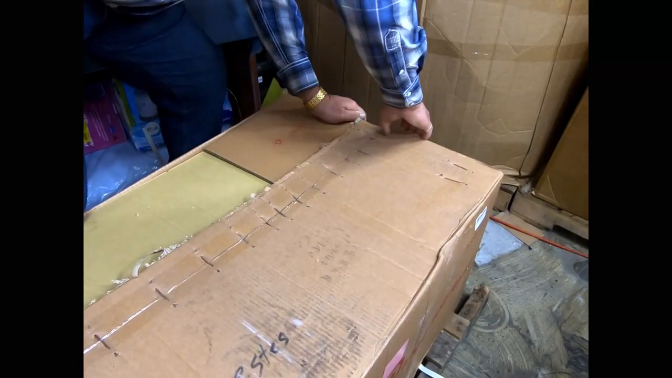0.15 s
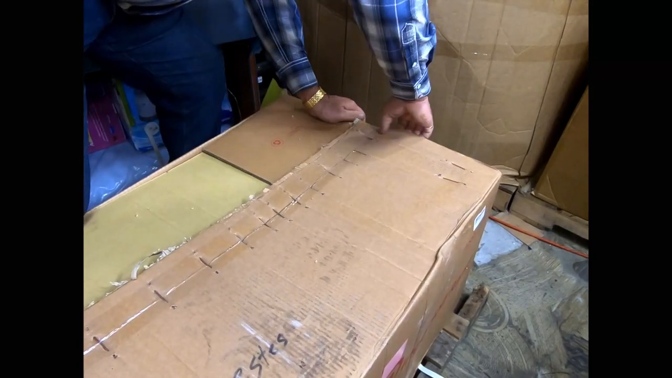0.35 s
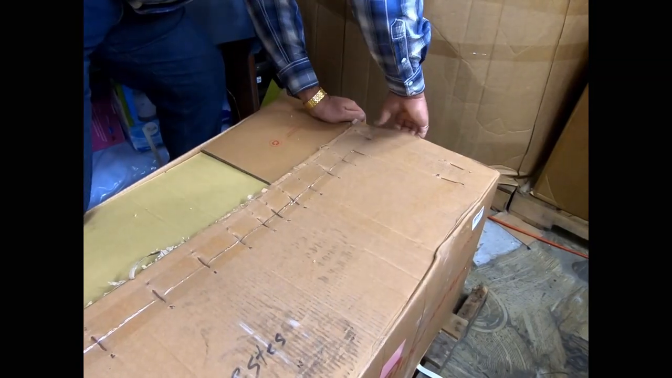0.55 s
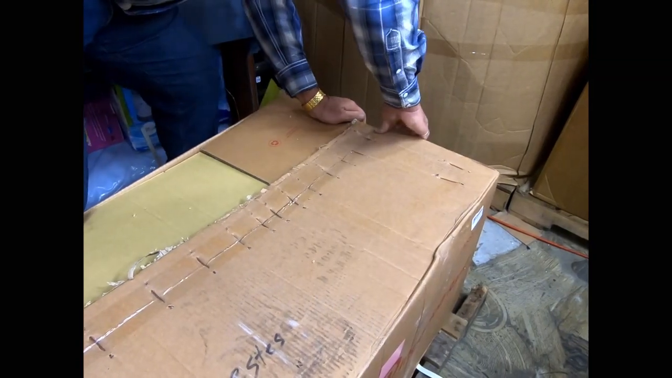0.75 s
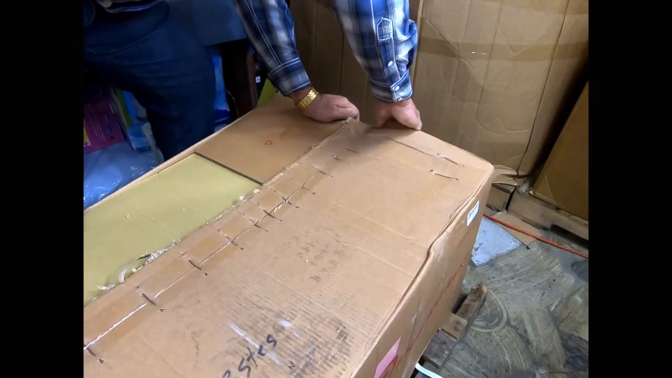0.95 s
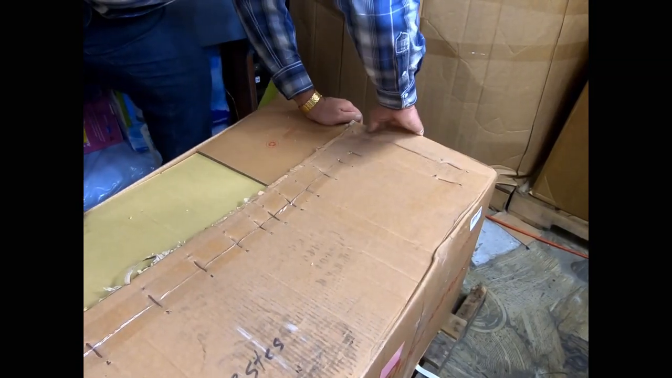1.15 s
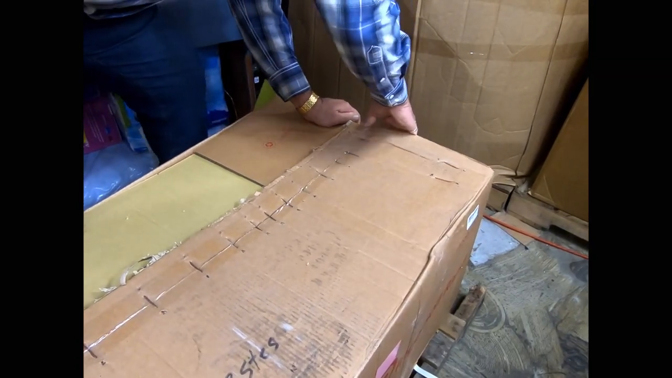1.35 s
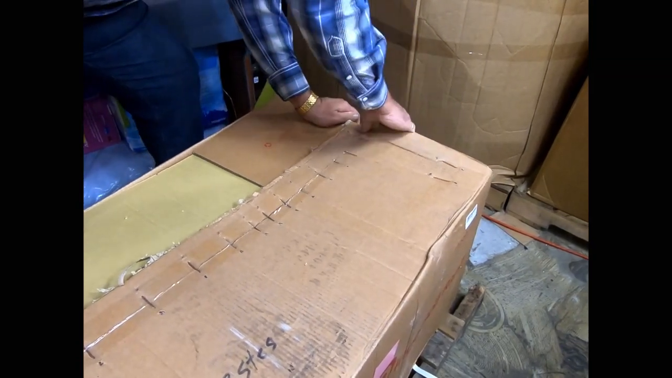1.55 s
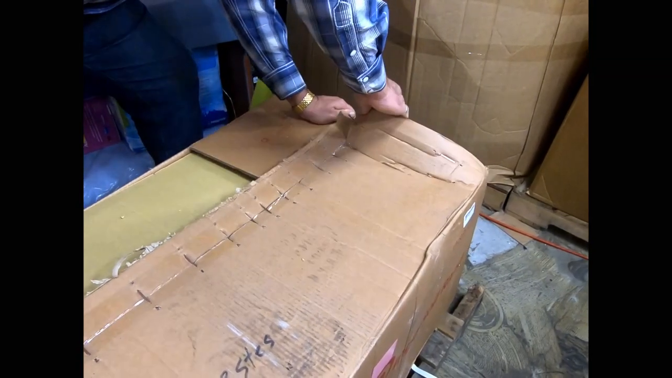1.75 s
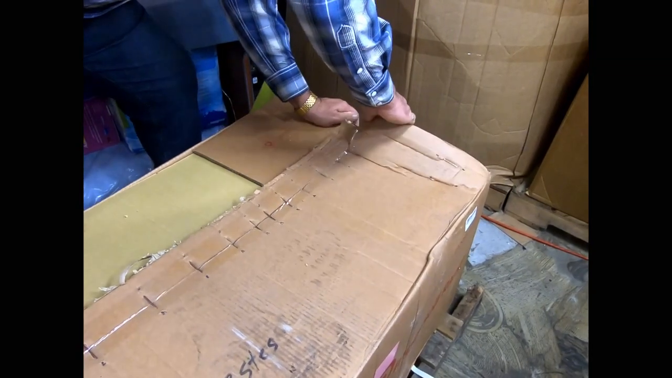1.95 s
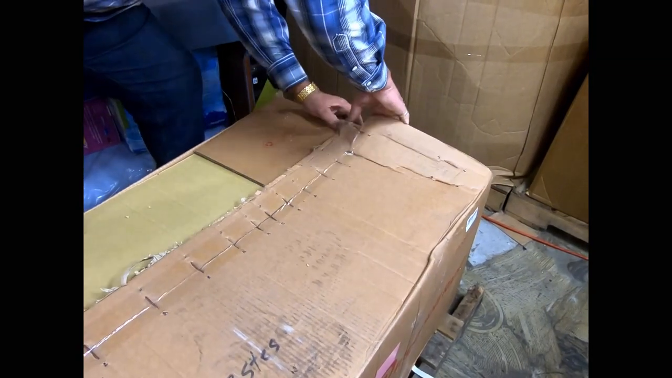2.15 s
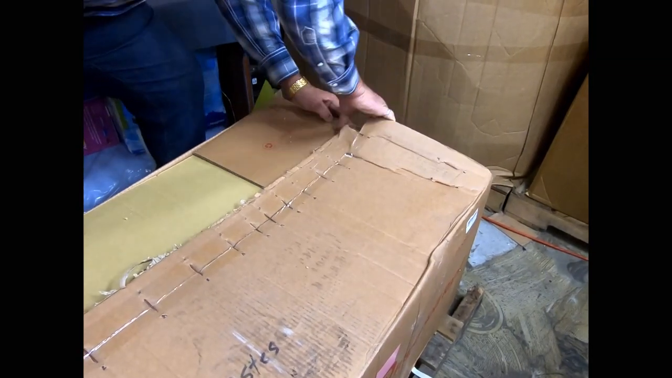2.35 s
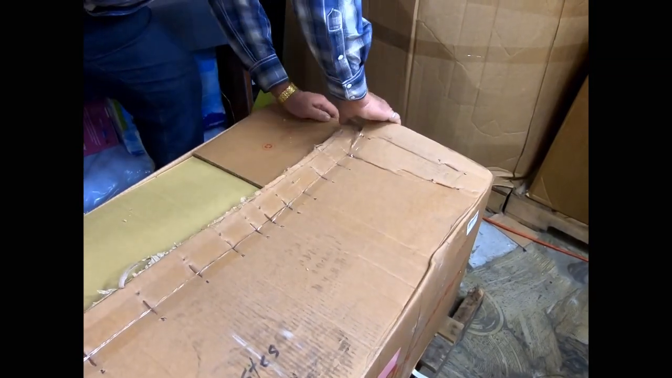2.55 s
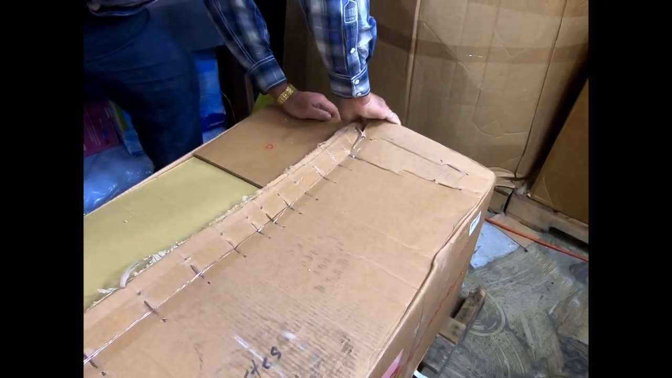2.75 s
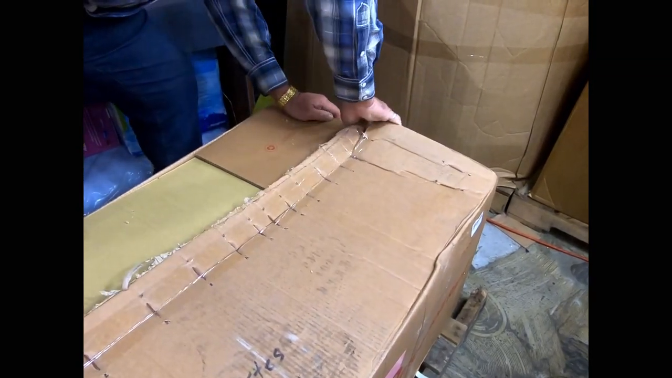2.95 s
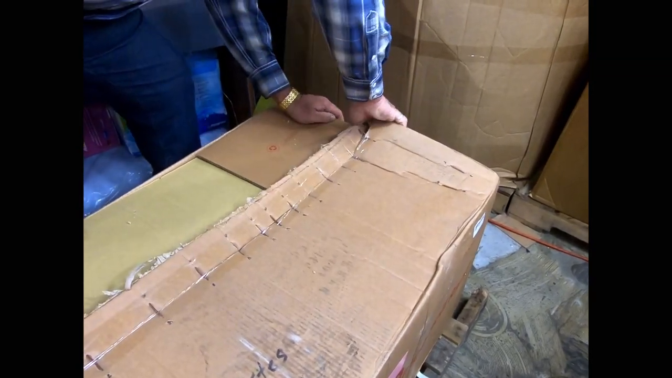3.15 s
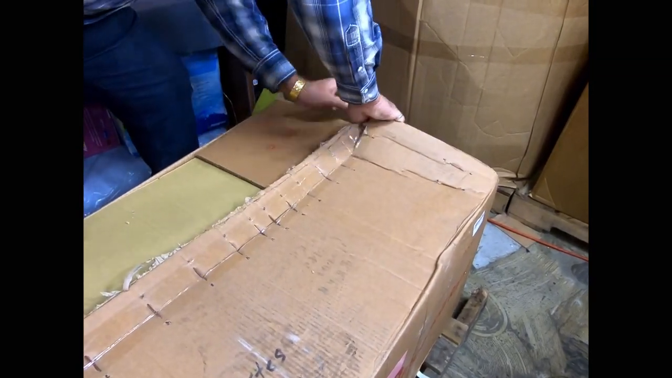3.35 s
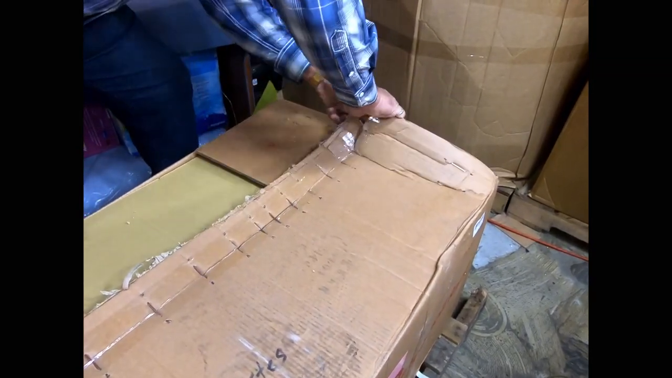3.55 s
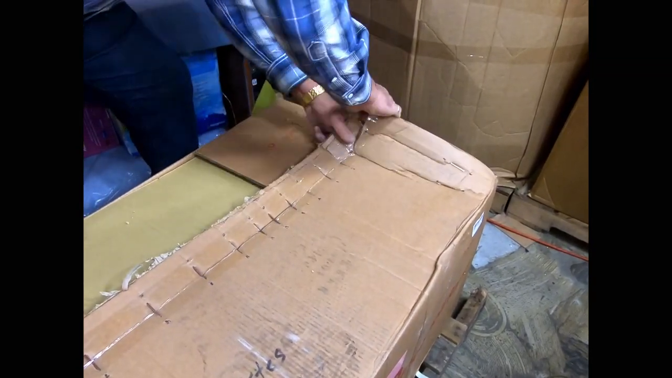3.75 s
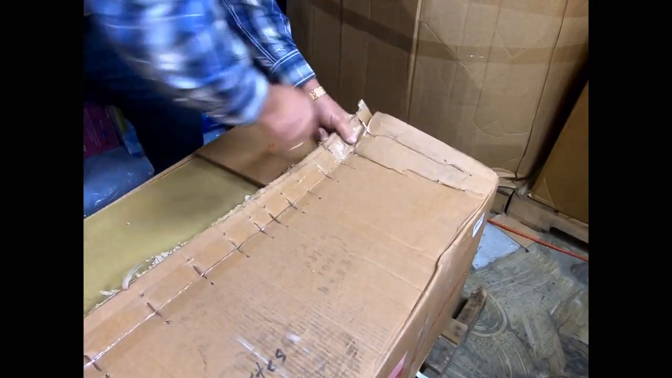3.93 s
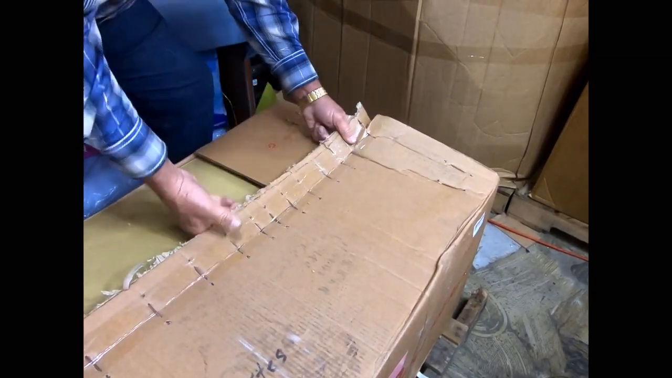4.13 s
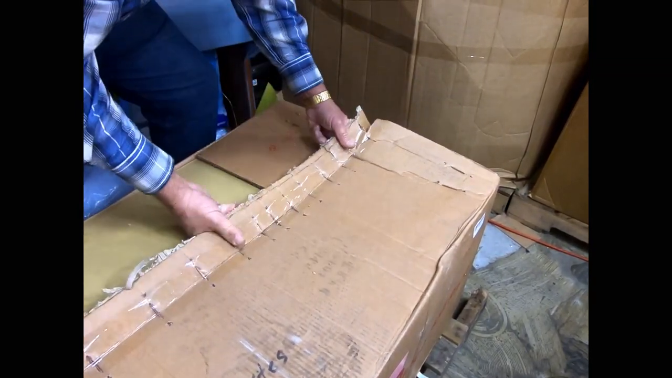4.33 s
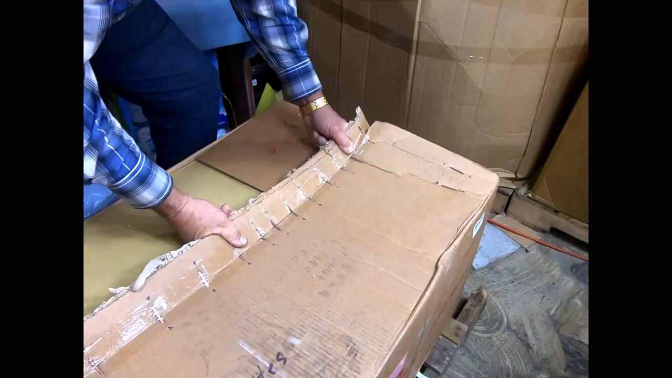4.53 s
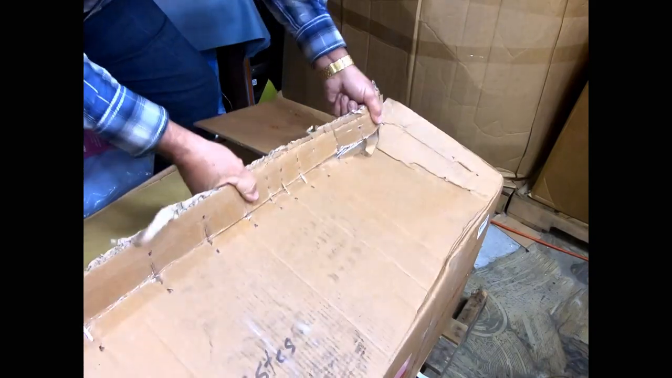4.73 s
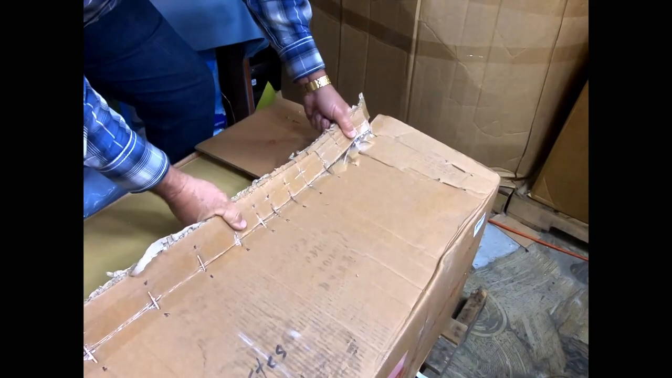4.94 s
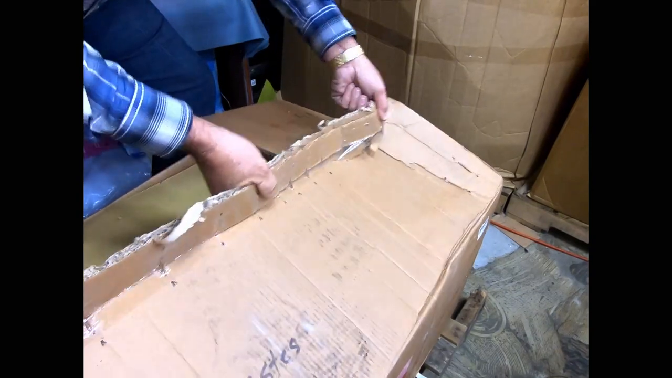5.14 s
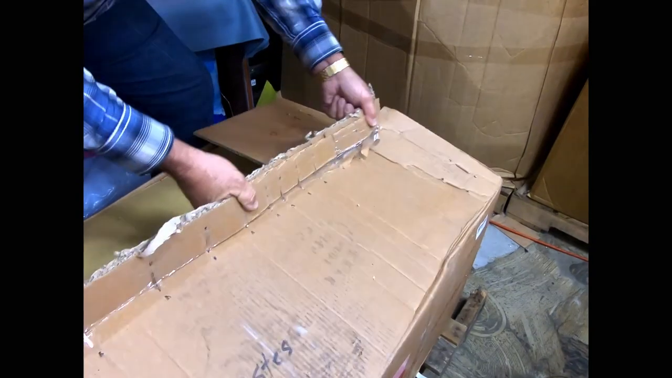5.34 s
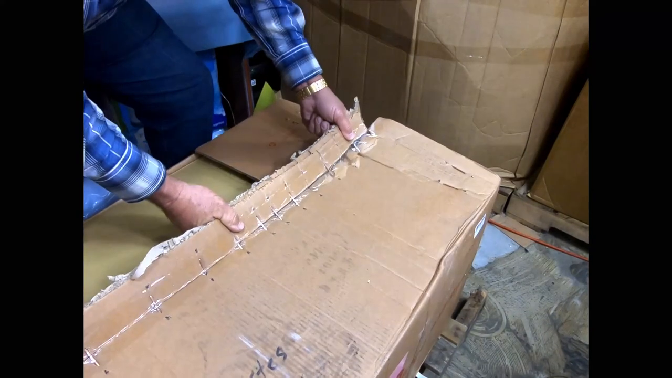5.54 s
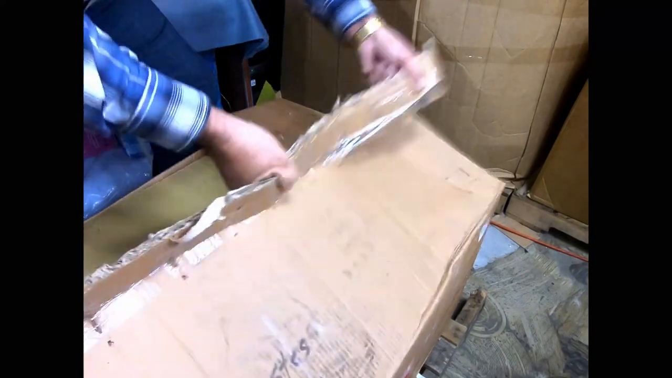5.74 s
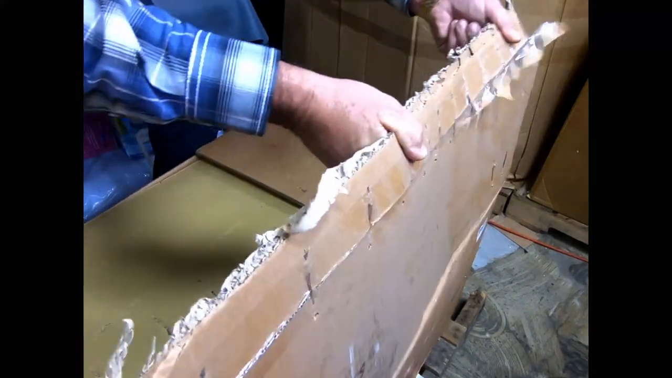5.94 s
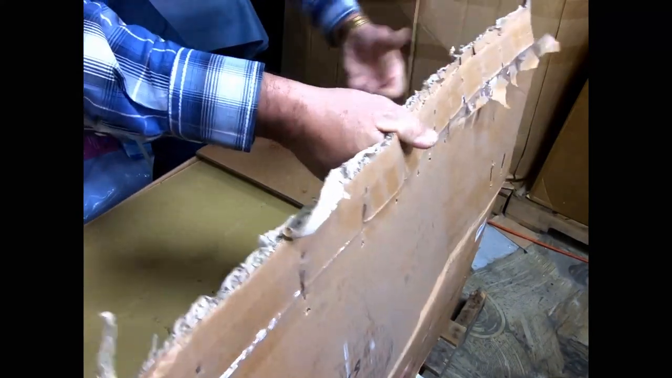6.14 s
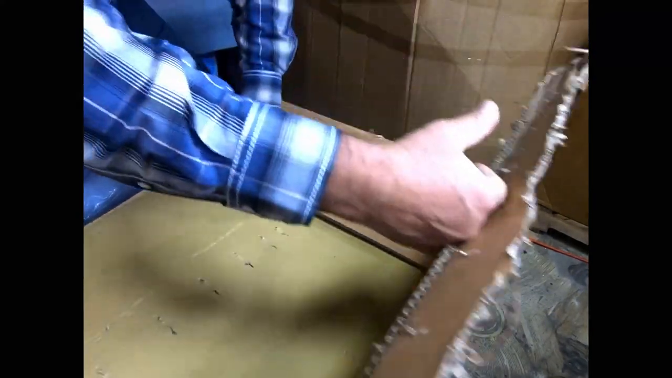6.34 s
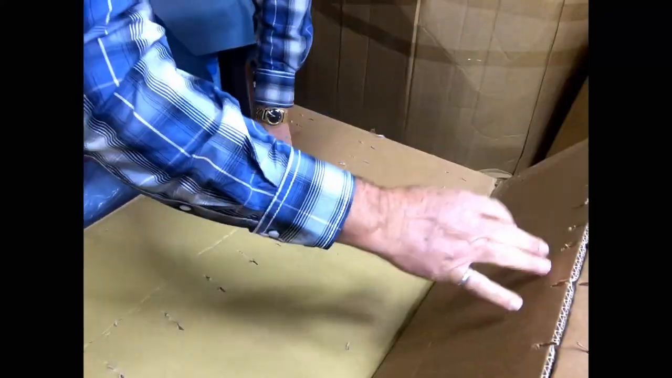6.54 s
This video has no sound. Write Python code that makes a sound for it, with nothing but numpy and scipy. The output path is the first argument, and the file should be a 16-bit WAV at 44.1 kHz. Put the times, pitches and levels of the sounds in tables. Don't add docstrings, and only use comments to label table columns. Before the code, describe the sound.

Close to a large hollow cardboard box in a bare, echoing storeroom with a faint hum. Hands rustle and press with small ticks, pops and short rubbing squeaks. A sudden hard tear cracks and booms, then quiet crackle. A staple snaps with papery fizz and creaking, staples drag in a rapid ratchet, and the flap rips away in loud bursts with deep thumps, wind buffets and final fine ticks.

```python
import sys
import numpy as np
from scipy import signal
from scipy.fft import rfft, irfft
from scipy.io import wavfile

SR = 44100
rng = np.random.default_rng(int(sys.argv[2]) if len(sys.argv) > 2 else 0)


def level_to_linear(level):
    exponent = np.asarray(level, float) / 20
    return 10 ** exponent


def persist_wave(psi):
    counts = np.round(np.clip(psi, -1, 1) * 32767).astype(np.int16)
    wavfile.write(sys.argv[1], SR, np.atleast_2d(counts).T)


N = 290486

# (frequency [Hz], level [dB per Hz])
HUM_SPECTRUM = [(20, -14), (50, 2.5), (120, 2), (300, -17.5), (700, -37), (1200, -22.5), (3000, -19.5),
                (7000, -39), (11000, -54.5), (16000, -60)]
# (time [s], rustle level [dB])
HANDLING = [(0, -60), (.3, -60), (.41, -67), (.68, -57), (.9, -66), (1.1, -65), (1.42, -58), (2.08, -62),
            (2.92, -66), (3.04, -66), (3.3, -59), (3.76, -70), (4.35, -54), (4.9, -52), (5.08, -66),
            (5.4, -53), (5.69, -72), (6.05, -57), (6.55, -59)]
# (peak time [s], time to swell 20 dB [s], crackle level [dB], time to fall 20 dB [s])
TEARS = [(.17, .16, -53, .25), (.93, .006, -41, .2), (.99, .06, -42, .08), (1.71, .16, -41, .06),
         (1.751, .004, -15, .095), (1.88, .11, -40, .33), (2.42, .6, -51, .3), (2.685, .06, -42, .05),
         (2.81, .008, -50, .04), (2.845, .03, -50, .05), (3.072, .01, -50, .1), (3.108, .05, -45, .07),
         (2.985, .07, -54, .07), (3.18, .01, -51, .04), (3.232, .012, -52, .2), (3.415, .12, -48, .08),
         (3.455, .015, -50, .05), (3.494, .003, -24, .03), (3.52, .02, -32, .19), (3.85, .015, -50, .1),
         (3.955, .16, -42, .025), (4.27, .08, -38.5, .11), (4.6, .15, -50, .2), (4.712, .01, -36, .11),
         (4.77, .075, -19, .055), (5.03, .2, -44.5, .03), (5.155, .012, -40, .05), (5.19, .02, -38, .05),
         (5.315, .1, -40, .02), (5.235, .07, -28.5, .07), (5.534, .012, -32, .04), (5.55, .02, -33, .03),
         (5.6, .3, -47, .03), (5.75, .015, -35, .3), (5.815, .025, -14, .06), (5.895, .05, -22.5, .05),
         (5.97, .11, -43, .4), (6.36, .16, -39, .05), (6.495, .04, -40, .04)]
# (peak time [s], time to swell 20 dB [s], rattle level [dB],
# time to fall 20 dB [s], boom above rattle [dB])
FLEXES = [(.41, .06, -53.5, .4, -3), (.6, .45, -52, .22, -1.5), (.94, .04, -49, .15, -9),
          (1.31, .2, -48, .55, -8), (1.727, .012, -21.5, .012, -12), (1.751, .004, -14.5, .045, -1.5),
          (1.81, .05, -28, .06, 8), (1.948, .008, -32, .025, -16), (2.7, .04, -53, .05, -1.5),
          (2.82, .02, -52, .09, 3), (3.11, .08, -54, .13, 3), (3.34, .06, -53, .06, -3),
          (3.494, .004, -31, .04, -5), (3.647, .006, -40, .04, -3), (2.29, .03, -55, .05, 2),
          (3.93, .06, -35, .04, -13), (4.37, .7, -53, .11, -8), (4.733, .02, -17, .05, -11),
          (4.77, .06, -25, .07, -11), (5.03, .2, -46, .03, -21), (5.238, .06, -32, .02, -26),
          (5.258, .006, -31, .05, -6), (5.3, .09, -39, .04, -1), (5.54, .17, -42.5, .11, -18),
          (5.845, .04, -9.5, .04, -2.5), (5.9, .05, -29, .11, 9), (6.54, .11, -52, .2, -1.5)]
# (peak time [s], time to swell 20 dB [s], level [dB],
# time to fall 20 dB [s])
RUBS = [(3.885, .05, -41, .03), (1.19, .11, -47, .15), (1.342, .015, -41, .05), (1.49, .012, -40, .012),
        (2.85, .06, -49, .03), (3.335, .05, -52, .04), (5.28, .11, -42, .06)]
# (frequency [Hz], level [dB per Hz])
FIBRE_SPECTRUM = [(1500, -39), (2500, 12), (3200, 6.5), (6000, 1), (8000, -1.5), (10000, -8),
                  (13000, -15.5), (16000, -21)]
# (frequency [Hz], width [Hz], level [dB])
PANEL_MODES = [(450, 80, -7.5), (611, 36, -1), (843, 220, -15)]
# (frequency [Hz], time to fall 60 dB [s])
ROOM_DECAY = [(200, 0.37), (1000, 0.3), (3000, 0.48), (8000, 0.53), (14000, 0.37)]
# (frequency [Hz], level [dB])
ROOM_COLOUR = [(200, -14), (700, -12.5), (1500, 1.5), (4000, -0.5), (9000, 4.5), (14000, -6.5)]
BAND_EDGES = 22 * 2 ** np.arange(0, 9.8, .5)
# (time [s], peak level [dB], ring [Hz], bright part level [dB])
SNAPS = [(0.038, -33, 3400, -35), (0.539, -32, 2200, -40), (0.927, -30, 2000, -25),
         (1.098, -37.5, 2020, -40), (1.694, -33, 1570, -37), (1.725, -19, 786, -30),
         (1.748, -0.5, 2970, -8), (1.779, -3.5, 1500, -25), (2.141, -37, 1530, -41),
         (2.203, -38, 1470, -53), (2.576, -30.5, 2950, -46), (2.651, -27, 2820, -31.5),
         (2.669, -35, 2500, -41), (3.491, -14, 1500, -5), (3.645, -19, 1400, -34), (3.684, -35, 1690, -46),
         (3.882, -30, 900, -42), (4.27, -23, 1760, -27), (4.289, -24, 1140, -33), (4.732, -5, 800, -13),
         (4.76, -12, 1890, -14), (4.881, -27.5, 3480, -41), (4.989, -32, 735, -39), (5.234, -16, 640, -27),
         (5.5, -33, 2500, -27), (5.529, -26, 1500, -30), (5.5865, -24.5, 2000, -36),
         (5.809, -16.5, 795, -11), (6.166, -35, 2160, -36), (6.475, -31, 1830, -39)]
# (time [s], peak level [dB], ring [Hz])
POPS = [(0.428, -37.5, 1190), (0.475, -28, 1500), (0.519, -30, 1250), (0.604, -37, 1500),
        (0.639, -39, 1400), (0.678, -39, 1360), (0.868, -35, 1250), (1.339, -33, 1210), (1.489, -36, 1300),
        (1.944, -25, 900), (2.807, -32, 1800), (2.838, -36, 1130), (3.105, -29, 3880), (3.174, -36, 1230),
        (3.918, -25, 891), (4.237, -28, 1150), (4.338, -23, 2770), (4.527, -36, 1630), (4.58, -24.5, 1590),
        (4.587, -25, 2500), (4.609, -28, 1670), (4.65, -24, 2040), (4.718, -12, 1000), (4.686, -30, 1200),
        (4.692, -32, 2200), (4.7205, -15, 900), (4.734, -10, 750), (5.183, -30, 1000), (5.193, -26, 750),
        (5.254, -15, 870), (5.2585, -16, 1100), (5.268, -27, 1700), (5.292, -27, 400), (5.535, -26, 1300),
        (5.734, -38, 810), (5.802, -18, 530), (5.8155, -14, 500), (3.878, -33, 950), (3.887, -31, 950),
        (3.936, -31, 900), (3.945, -34, 1000), (3.958, -34, 1500), (4.533, -36, 1600), (4.6, -31, 1600),
        (4.623, -33, 1600), (4.637, -34, 1900), (1.771, -9, 1500), (1.702, -34, 2000), (1.676, -38, 2500),
        (5.552, -29, 1000), (5.85, -8.5, 990), (6.425, -37, 2200)]
# (time [s], peak level [dB], centre [Hz])
TICKS = [(.112, -42, 2200), (.132, -43, 3500), (.176, -38, 6000), (.192, -43, 2200), (.2259, -41, 3500),
         (.24, -43, 2500), (.2513, -39, 3500), (.3258, -37.5, 6500), (.376, -42, 2600), (.394, -43, 3000),
         (.49, -42, 3500), (.66, -43, 2000), (.7153, -42, 2500), (.7322, -36, 6300), (.825, -43, 2200),
         (.834, -42, 2600), (.994, -30, 4000), (1.05, -36, 4500), (1.397, -35, 5000), (.935, -29, 3500),
         (.948, -33, 3200), (1.445, -39, 1500), (1.63, -37, 6000), (2.11, -38, 4200), (2.181, -42, 1540),
         (2.23, -40, 6500), (2.289, -42, 1600), (2.4435, -37, 1800), (2.531, -40, 3500),
         (2.5564, -31, 5500), (2.583, -39, 3000), (2.6325, -36, 3200), (2.645, -32, 4000),
         (2.694, -35, 4000), (3.069, -41, 3800), (3.175, -38, 4500), (3.2255, -41, 2900),
         (3.447, -39, 4000), (3.4935, -9, 6500), (3.495, -12, 5000), (3.51, -16, 6500), (3.518, -20, 6000),
         (6.0563, -34, 5000), (6.0967, -38, 1600), (6.122, -36, 6000), (6.172, -36, 6500),
         (6.18, -37, 2500), (6.2698, -37, 6000), (6.286, -34, 5000), (6.2973, -31, 7000),
         (6.316, -33, 6000), (6.3337, -33, 3400), (6.3516, -28, 6400), (6.38, -32, 2100),
         (6.4873, -30, 5000), (6.5, -33, 1700), (6.518, -38, 5000), (6.5632, -36, 1840),
         (4.089, -30, 4500), (4.15, -26, 6500), (4.2527, -29, 5500), (4.298, -30, 4000), (4.313, -32, 4500),
        (4.345, -34, 3000), (4.384, -40, 8500), (4.3959, -35, 4500), (4.415, -31, 4000), (4.453, -30, 4200),
        (4.464, -37, 6500), (4.4798, -32, 5000), (4.5058, -21.5, 5200), (4.57, -31, 2700),
        (4.6194, -28, 6000), (4.668, -32, 4700), (4.7018, -26, 5500), (4.7055, -28, 4500),
        (4.708, -26, 2500), (4.728, -18, 3500), (4.547, -36, 3000), (4.563, -35, 4200), (4.587, -27, 5500),
        (4.612, -27, 3300), (4.652, -30, 4500), (4.663, -35, 4200), (4.676, -35, 4200), (5.517, -39, 3500),
        (5.418, -41, 6500), (4.7685, -10, 4000), (4.9226, -27, 3500), (4.9756, -33, 4900),
        (4.9978, -32.5, 3500), (5.0062, -33, 5300), (5.0264, -32, 4000), (5.1196, -35, 4300),
        (5.134, -40, 4000), (5.148, -29, 3000), (5.1555, -25, 6500), (5.1645, -26, 5500),
        (5.212, -24, 5000), (5.2365, -18, 3500), (5.28, -26, 4000), (5.452, -41, 4000), (5.462, -34, 6500),
        (5.476, -34, 5000), (5.548, -26, 4800), (5.575, -30, 5000), (5.6055, -30, 5500), (5.628, -38, 4500),
        (5.653, -39, 6500), (5.6652, -35, 4000), (5.722, -37, 5500), (5.748, -30, 8000), (5.893, -13, 3500),
        (5.9381, -21, 5100), (5.9385, -24, 8500), (6.365, -27, 4500)]
# (time [s], slips per second [Hz], level [dB], unevenness [0-1])
MOANS = [
    [(.372, 500, -58, .2), (.394, 515, -48, .1), (.404, 500, -48, .1), (.42, 480, -60, .2)],
    [(5.746, 560, -48, .4), (5.753, 580, -40, .3), (5.763, 610, -41, .3), (5.774, 640, -50, .5)],
]
# (frequency [Hz], width [Hz], level [dB])
MOAN_MODES = [(554, 330, -10.5), (1060, 180, -12), (1460, 1000, -17)]
# (time [s], slips per second [Hz], level [dB], unevenness [0-1])
SQUEAKS = [
    [(1.198, 700, -46, .8), (1.218, 710, -38, .7), (1.232, 750, -34, .2), (1.25, 790, -35.5, .1),
     (1.272, 850, -46, .2)],
    [(1.272, 1490, -46, .7), (1.284, 1478, -39, .1), (1.298, 1445, -36, .1), (1.312, 1360, -41, .6),
     (1.328, 1250, -45, .9)],
    [(1.495, 730, -46, .5), (1.505, 779, -40, .1), (1.514, 810, -39, .1), (1.524, 794, -38, .1),
     (1.536, 785, -52, .2)],
    [(1.573, 770, -38, .6), (1.586, 753, -36, .1), (1.595, 737, -40, .1), (1.603, 745, -52, .3)],
]
# (frequency [Hz], width [Hz], level [dB])
SQUEAK_MODES = [(800, 190, -12.5), (1570, 880, -8.5), (2340, 420, -1.5), (3310, 580, -5.5), (4220, 330, -3),
                (5830, 330, -17.5), (7360, 500, -12.5)]
# (time [s], peak level [dB], frequency [Hz])
THUMPS = [(0.474, -41, 462), (1.748, -12, 471), (1.769, -22, 146), (1.809, -13.5, 150), (2.806, -40, 129),
          (2.81, -48, 280), (3.646, -44, 170), (4.234, -41.5, 170), (4.729, -17.5, 185),
          (4.828, -28.5, 481), (5.232, -22, 610), (5.834, -7.5, 214), (5.855, -7, 195), (5.856, -13, 320),
          (5.878, -18, 200), (5.951, -18.5, 179)]
# (peak time [s], time to swell 20 dB [s], level [dB], time to fall 20 dB [s])
FIZZ = [
    (3.493, .002, -26, .02),
    (3.515, .012, -35, .17),
    (5.42, .05, -52, .03),
    (5.812, .02, -33, .04),
    (6.36, .1, -50, .04),
]
# (time [s], peak level [dB])
CREAK = [(3.508, -36), (3.5174, -37), (3.527, -38), (3.535, -38), (3.5424, -38), (3.549, -38),
         (3.5564, -36), (3.5674, -40), (3.5753, -39), (3.5874, -47), (3.6027, -38), (3.6167, -38),
         (3.6354, -40)]
# (time [s], peak level [dB])
RATCHET = [(4.0125, -35.5), (4.0286, -34), (4.0487, -30), (4.0692, -27), (4.0862, -26), (4.0994, -27),
           (4.1122, -31), (4.132, -26.5), (4.1595, -24), (4.1828, -28.5), (4.204, -23.5), (4.2271, -24),
           (4.3178, -27)]
# (frequency [Hz], width [Hz], level [dB])
FLUTE_MODES = [(1070, 99, 0), (1830, 250, 1.5), (2880, 460, -1), (5560, 4000, -21)]
# (peak time [s], time to swell 20 dB [s], level [dB], time to fall 20 dB [s])
GUSTS = [
    (4.75, .06, -54, .2),
    (5.85, .05, -29, .11),
    (5.92, .07, -24, .04),
    (6.225, .03, -36, .08),
    (6.29, .06, -29, .1),
    (6.35, .08, -33, .06),
]


def rms_one(x):
    return x / np.sqrt(np.mean(x ** 2) + 1e-20)


def peak_at(x, db):
    return level_to_linear(db) * x / np.max(np.abs(x))


def add(out, s, piece):
    at = round(s * SR)
    out[at:at + len(piece)] += piece[:N - at]


def in_time(rows):
    s, *columns = np.transpose(rows)
    return [np.interp(np.arange(N) / SR, s, column) for column in columns]


def swells(rows, extra_db=0):
    s, rise, db, fall = np.transpose(rows)[:4, :, None]
    late = np.arange(0, N + 32, 32) / SR - s
    slope = np.maximum(-late / rise, late / fall)
    level = level_to_linear(db + np.reshape(extra_db, (-1, 1)) - 20 * slope)
    total = np.sqrt(np.sum(level ** 2, axis=0))
    return np.interp(np.arange(N) / 32, np.arange(late.shape[1]), total)


def drift(rate):
    knots = rng.standard_normal(int(N / SR * rate) + 2)
    return np.interp(np.arange(N) / SR * rate, np.arange(len(knots)), knots)


def at_hz(points, hz):
    table_hz, value = np.transpose(points)
    return np.interp(np.log(hz), np.log(table_hz), value)


def colour(x, spectrum):
    hz = np.arange(N // 2 + 1) * SR / N + 1
    return rms_one(irfft(rfft(x) * level_to_linear(at_hz(spectrum, hz)), N))


def band(x, low_hz, high_hz):
    edges = [low_hz, min(high_hz, .45 * SR)]
    return signal.sosfilt(signal.butter(2, edges, "band", fs=SR, output="sos"), x)


def resonate(x, hz, width_hz):
    r = np.exp(-np.pi * width_hz / SR)
    gain = (1 - r * r) / 2
    return signal.lfilter([gain, 0, -gain], [1, -2 * r * np.cos(2 * np.pi * hz / SR), r * r], x)


def modes(x, table, spread_db=0):
    out = 0
    for k, (hz, width_hz, db) in enumerate(table):
        strength = level_to_linear(db + spread_db * rng.standard_normal())
        out = out + (-1) ** k * strength * resonate(x, hz, width_hz)
    return out


def grains(per_s, spread_db, clump_db):
    born = rng.random(N) < per_s * level_to_linear(clump_db * drift(70)) / SR
    size = level_to_linear(spread_db * np.minimum(rng.exponential(1, N), 4))
    return born * size * rng.choice([-1, 1], N) + 1e-18


def crack(t60):
    t = np.arange(1024) / SR
    burst = rng.standard_normal(1024) * level_to_linear(-60 * t / t60)
    burst[0] = 3.27
    return burst


def room_hum():
    return level_to_linear(-60.5 + drift(9.9)) * colour(rng.standard_normal(N), HUM_SPECTRUM)


def fibre_rip():
    return rms_one(grains(2500, spread_db=4, clump_db=5)) + .55 * rng.standard_normal(N)


def fibre_crackle(rip, hands, tear, flex):
    bright = np.hypot(hands, tear)
    tear_and_hands = np.hypot(level_to_linear(-5) * tear, level_to_linear(.6) * hands)
    dull = np.hypot(tear_and_hands, level_to_linear(-7) * flex + swells(RUBS))
    pops = rms_one(grains(110, spread_db=3, clump_db=5)) * np.sqrt(hands / bright)
    flutes = rms_one(band(rip, 960, 2800)) + .8 * rms_one(resonate(pops, 1163, width_hz=230))
    return bright * colour(rip + .38 * pops, FIBRE_SPECTRUM) + dull * band(flutes, 1040, 2560)


def panel_rattle(hands, tear, flex):
    level = np.hypot(flex, level_to_linear(-13) * hands + level_to_linear(-22) * tear)
    rattle = grains(1500, spread_db=5, clump_db=3.5)
    return level * rms_one(band(modes(rattle, PANEL_MODES) + .35 * rattle, 300, 1070))


def box_boom(hands):
    boom_above_rattle_db = np.transpose(FLEXES)[-1]
    level = np.hypot(swells(FLEXES, boom_above_rattle_db), level_to_linear(-1.5) * hands)
    return level * rms_one(band(grains(500, spread_db=3.5, clump_db=3), 110, 292))


def storeroom(x):
    t = np.arange(SR) / SR
    white = rng.standard_normal((2, SR))
    tail = np.zeros(SR)
    for k, (low, high) in enumerate(zip(BAND_EDGES[4:], BAND_EDGES[5:])):
        fall_db = 60 * t / at_hz(ROOM_DECAY, low * .87)
        tail += level_to_linear(at_hz(ROOM_COLOUR, low * 1.416) - fall_db) * band(white[k % 2], low, high)
    tail *= 1 - np.exp(-(t / .0027) ** 2)
    return signal.fftconvolve(x, tail / np.sqrt(np.sum(tail ** 2)))[:N]


def snaps_and_pops():
    out = np.zeros(N)
    pops = [(s, db, hz, db - 22) for s, db, hz in POPS]
    for s, db, hz, bright_db in SNAPS + pops:
        burst = crack(t60=.008)
        note = band(resonate(burst, hz, width_hz=hz / 4), hz * .6, hz * 1.8)
        broad = band(band(burst, 900, 3500), 500, 5000)
        bright = band(band(burst, 3500, 7500), 2500, 10000)
        add(out, s, peak_at(note + .22 * broad, db))
        add(out, s, peak_at(bright, bright_db + .5))
    return out


def ticks():
    out = np.zeros(N)
    for s, db, hz in TICKS:
        tick = band(crack(t60=.0035), hz * .62, hz * 1.45)
        add(out, s, peak_at(band(tick, hz * .4, hz * 1.9), db))
    return out


def squeaks(tables, ringing, top_hz):
    out, t = np.zeros(N), np.arange(N) / SR
    wobble, sizes = drift(400), rng.standard_normal(N)
    for rows in tables:
        per_s, db, uneven = in_time(rows)
        slip_count = np.floor(np.cumsum(per_s * (1 + .14 * uneven * wobble)) / SR)
        slips = np.diff(slip_count, prepend=0)
        rubbing = slips * level_to_linear(6 * uneven * wobble + 1.5 * sizes) + .05 * sizes
        fade = np.clip(np.minimum(t - rows[0][0], rows[-1][0] - t) / .0037, 0, 1)
        out += fade * level_to_linear(db) * rms_one(band(modes(rubbing, ringing), 400, top_hz))
    return out


def thumps():
    out, t = np.zeros(N), np.arange(SR // 4) / SR
    for s, db, hz in THUMPS:
        level = level_to_linear(db + 1.5 - 60 * t / .069) * (1 - np.exp(-t / .003))
        add(out, s, level * np.sin(2 * np.pi * hz * t))
    return out


def paper_fizz(rip):
    return swells(FIZZ) * rms_one(band(rip, 4300, 9300))


def seam_creak():
    out = np.zeros(N)
    for s, db in CREAK:
        note = resonate(crack(t60=.004), 1020, width_hz=130)
        add(out, s, peak_at(band(note, 860, 1800), db + 3))
    return out


def staple_ratchet():
    out = np.zeros(N)
    for s, db in RATCHET:
        ring = modes(crack(t60=.0008), FLUTE_MODES, spread_db=2)
        add(out, s, peak_at(band(ring, 800, 7000), db))
        add(out, s + .001, peak_at(band(crack(t60=.012), 1500, 6500), db - 13))
    return out


def gusts():
    return swells(GUSTS) * rms_one(band(rng.standard_normal(N), 27.4, 59))


def scene():
    hands, tear, flex = level_to_linear(in_time(HANDLING)[0]), swells(TEARS), swells(FLEXES)
    rip = fibre_rip()
    box = level_to_linear(-4) * fibre_crackle(rip, hands, tear, flex)
    box += level_to_linear(-5) * panel_rattle(hands, tear, flex) + level_to_linear(-4.5) * box_boom(hands)
    box += snaps_and_pops() + ticks() + thumps()
    box += paper_fizz(rip) + seam_creak() + staple_ratchet()
    rubs = squeaks(MOANS, MOAN_MODES, top_hz=1500) + squeaks(SQUEAKS, SQUEAK_MODES, top_hz=5950)
    echoes = level_to_linear(-13) * storeroom(box + .5 * rubs)
    return (box + rubs + echoes + gusts() + room_hum())[None]


def band_limit(x):
    return signal.sosfilt(signal.butter(12, 16470, fs=SR, output="sos"), x)


def record(dry):
    mic = signal.sosfilt(signal.butter(2, 12000, fs=SR, output="sos"), dry)
    rounded = .72 * np.tanh(mic / .59)
    top_cut = signal.cheby2(10, 60, 16800, fs=SR, output="sos")
    return band_limit(signal.sosfilt(top_cut, rounded))


dry = scene()
out = record(dry)
persist_wave(out)
```